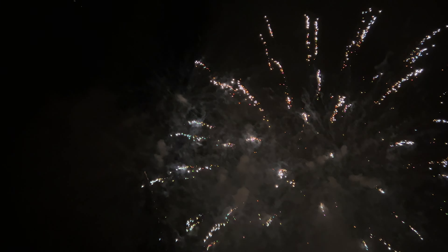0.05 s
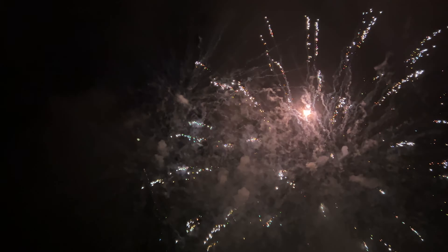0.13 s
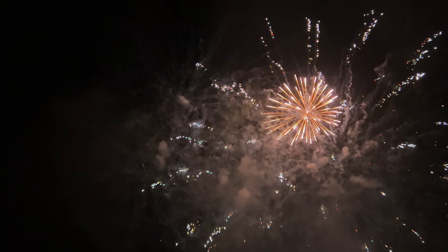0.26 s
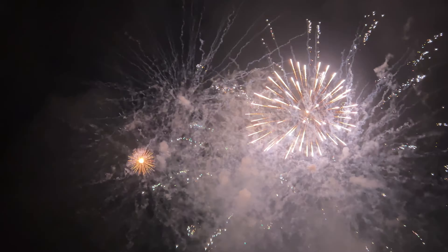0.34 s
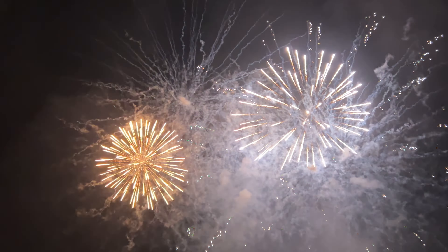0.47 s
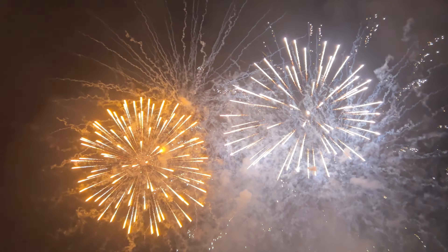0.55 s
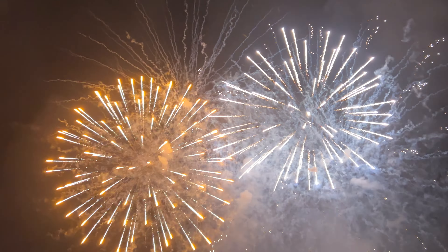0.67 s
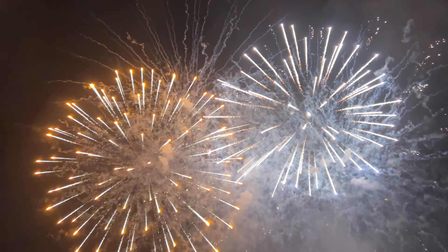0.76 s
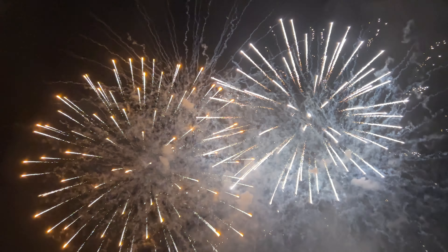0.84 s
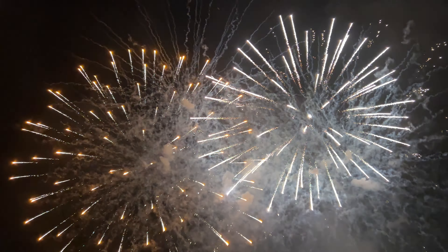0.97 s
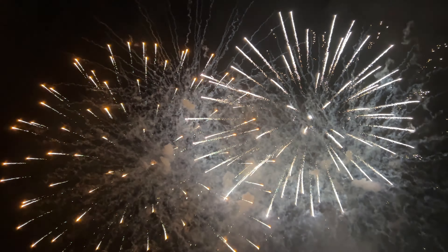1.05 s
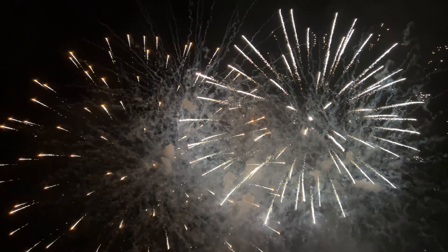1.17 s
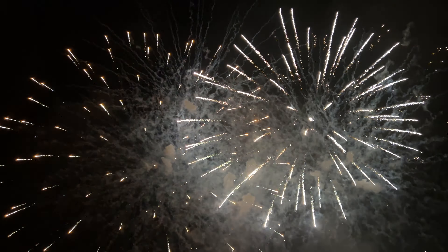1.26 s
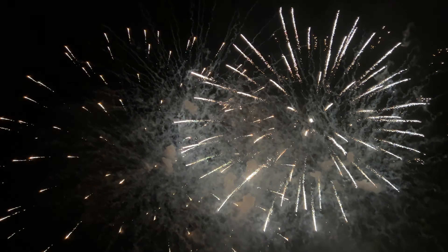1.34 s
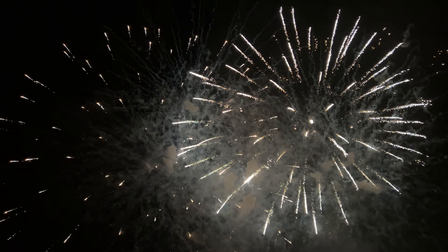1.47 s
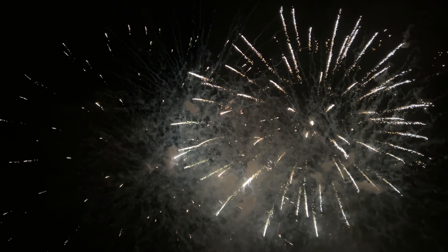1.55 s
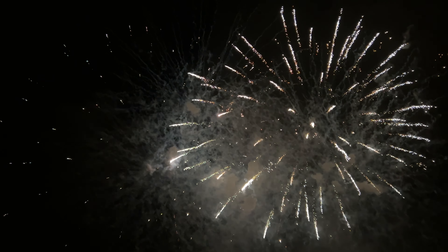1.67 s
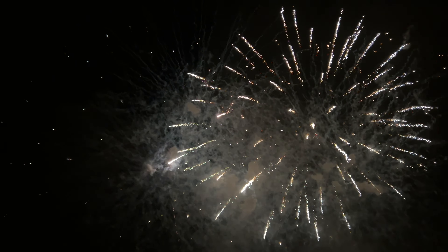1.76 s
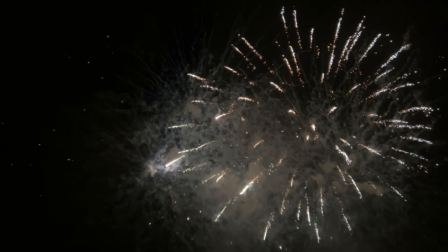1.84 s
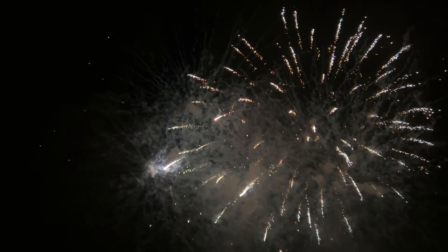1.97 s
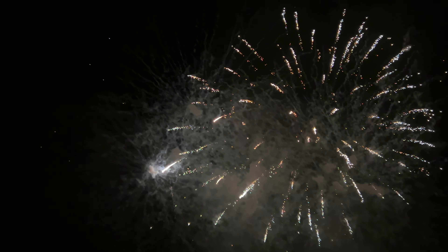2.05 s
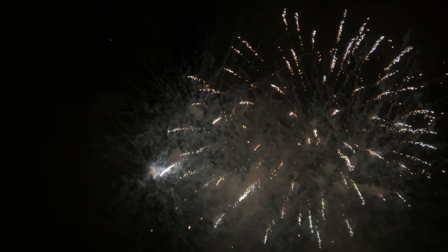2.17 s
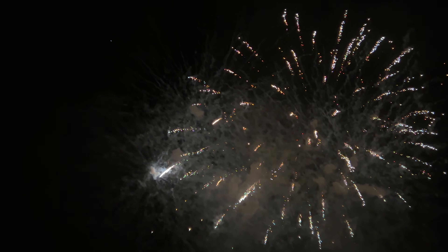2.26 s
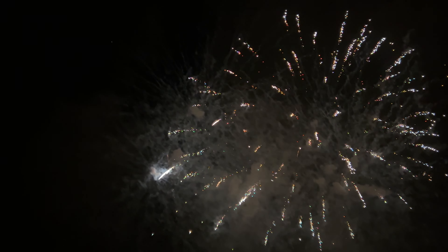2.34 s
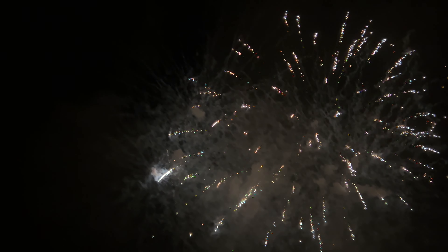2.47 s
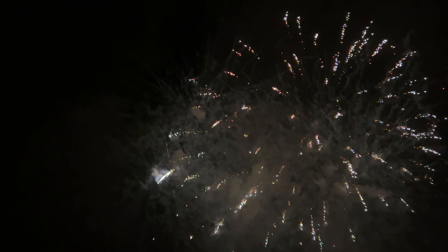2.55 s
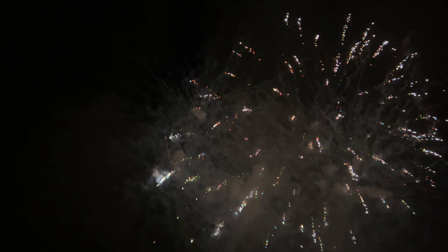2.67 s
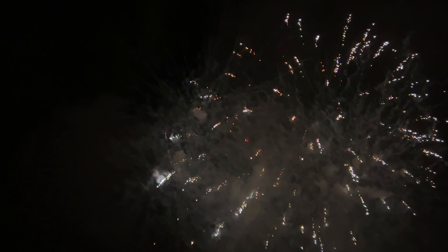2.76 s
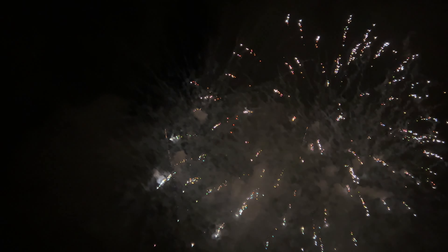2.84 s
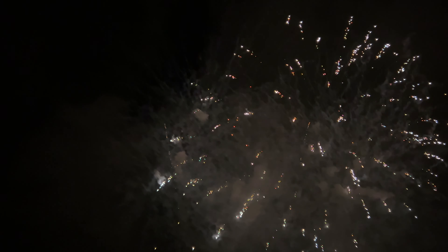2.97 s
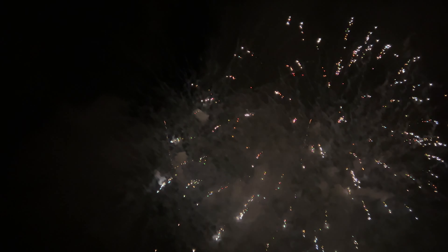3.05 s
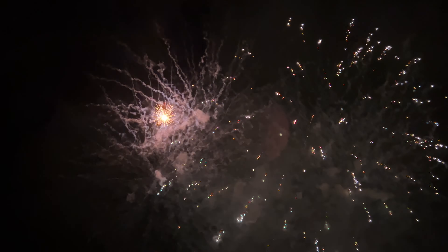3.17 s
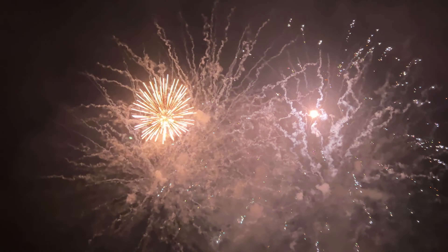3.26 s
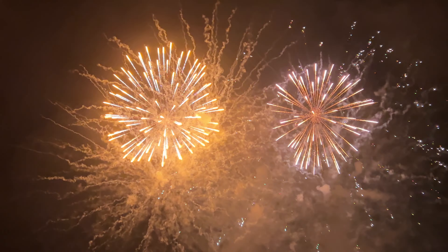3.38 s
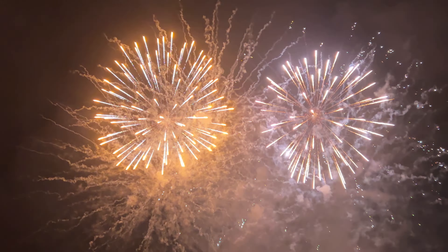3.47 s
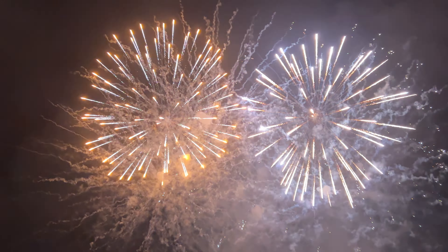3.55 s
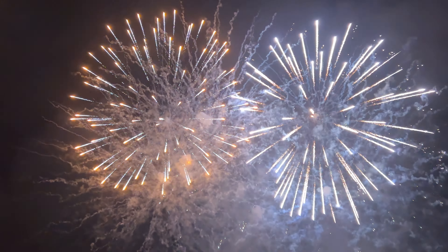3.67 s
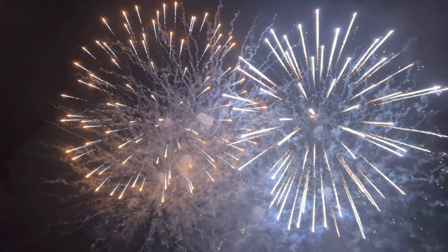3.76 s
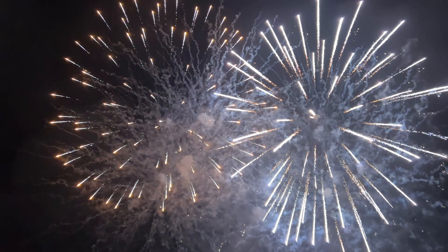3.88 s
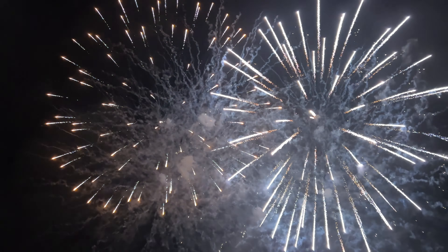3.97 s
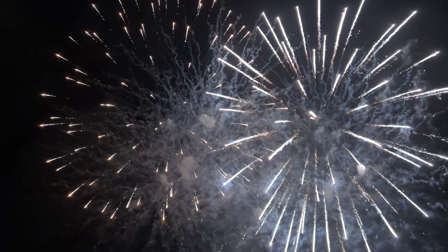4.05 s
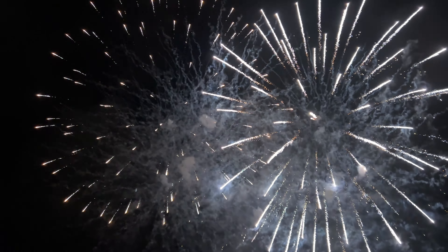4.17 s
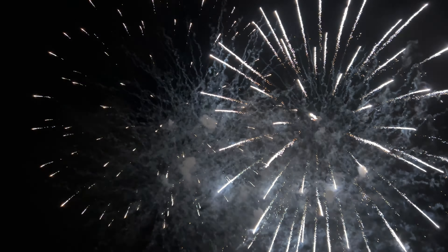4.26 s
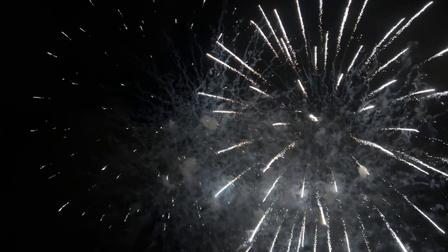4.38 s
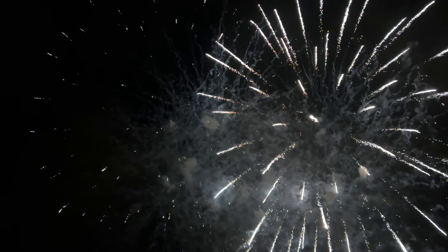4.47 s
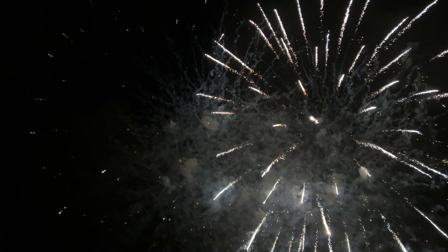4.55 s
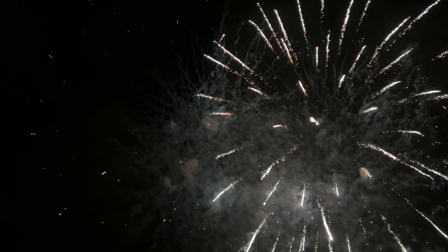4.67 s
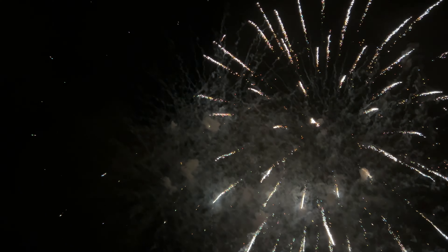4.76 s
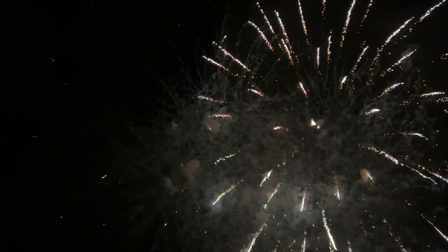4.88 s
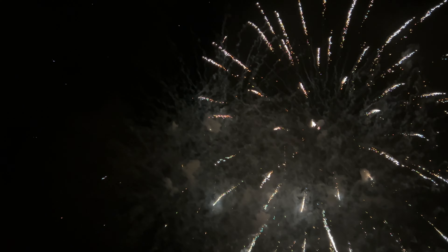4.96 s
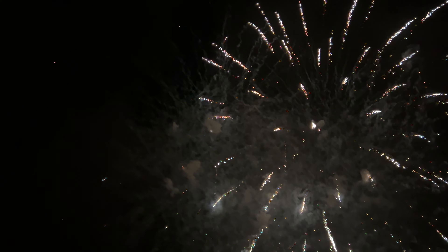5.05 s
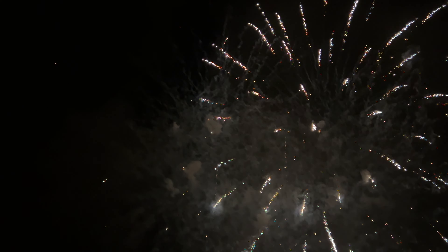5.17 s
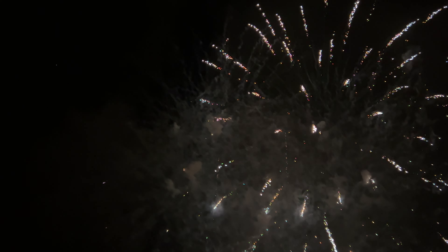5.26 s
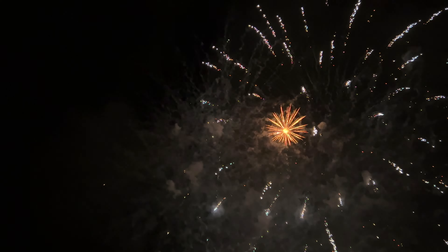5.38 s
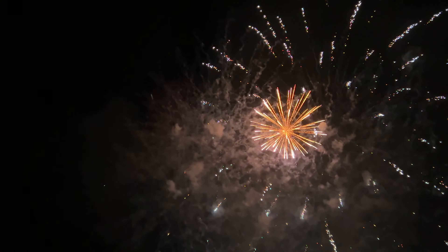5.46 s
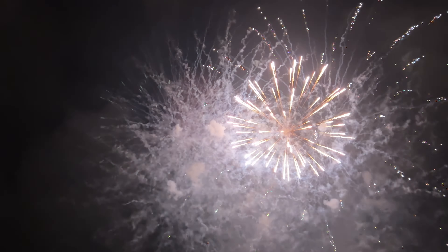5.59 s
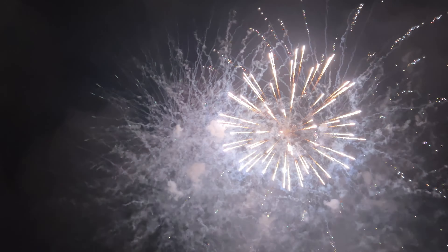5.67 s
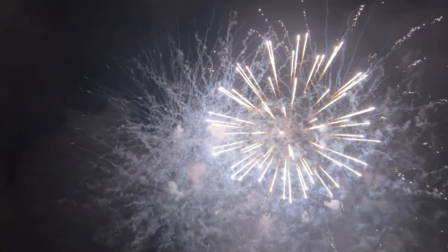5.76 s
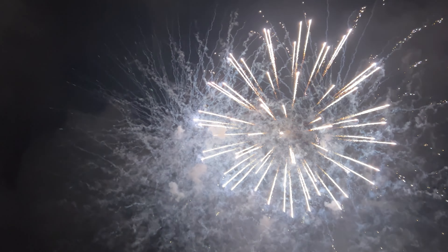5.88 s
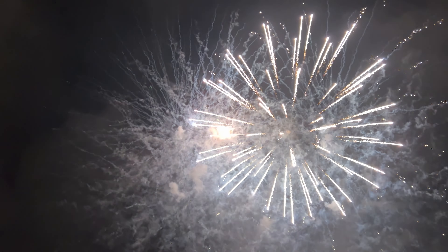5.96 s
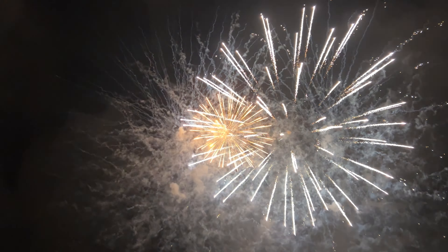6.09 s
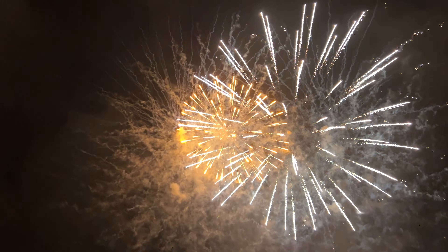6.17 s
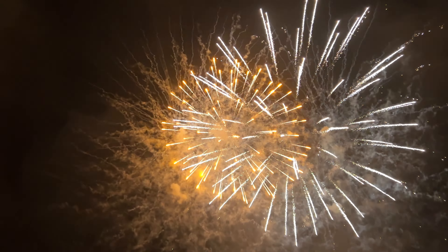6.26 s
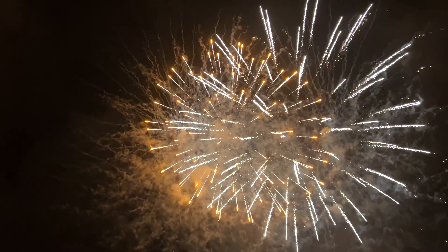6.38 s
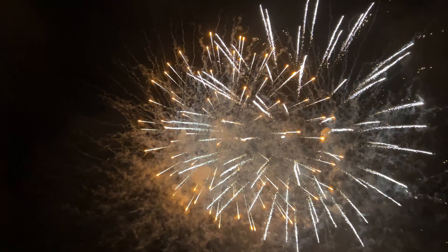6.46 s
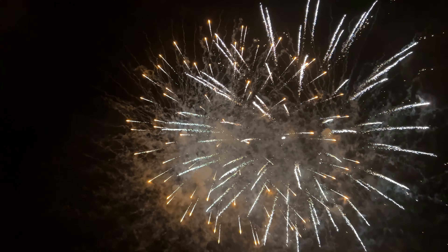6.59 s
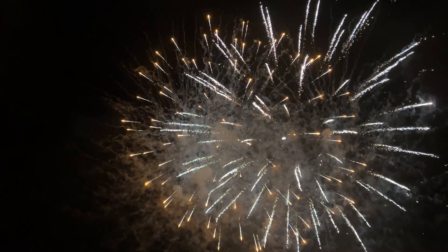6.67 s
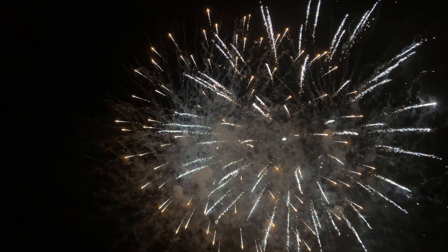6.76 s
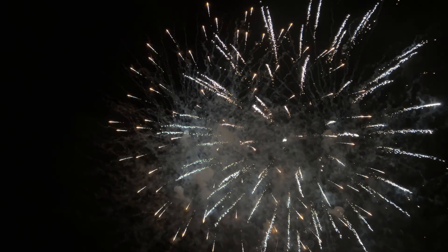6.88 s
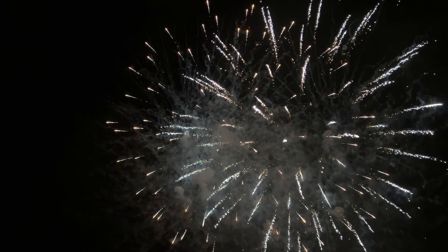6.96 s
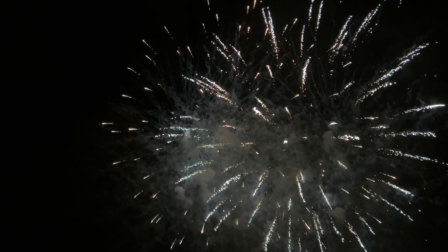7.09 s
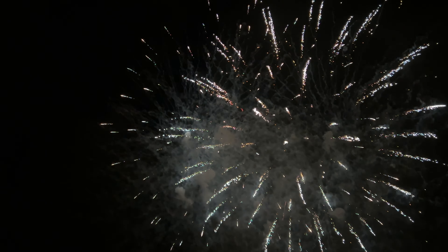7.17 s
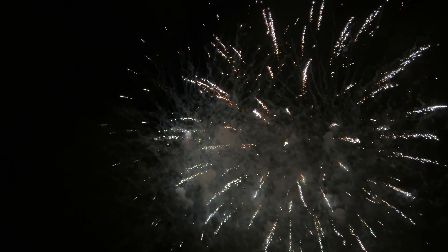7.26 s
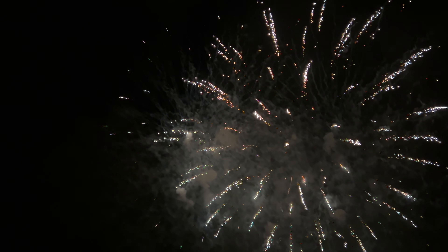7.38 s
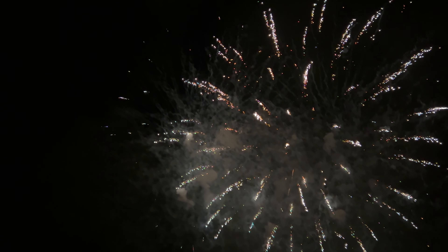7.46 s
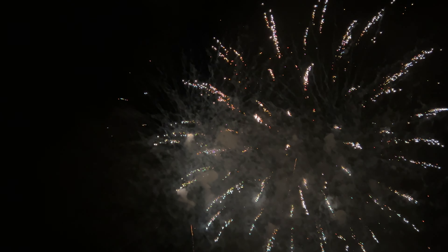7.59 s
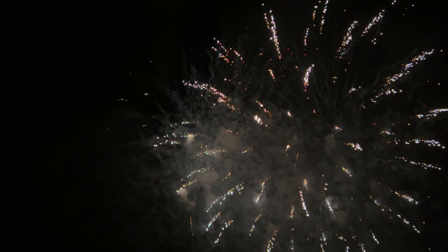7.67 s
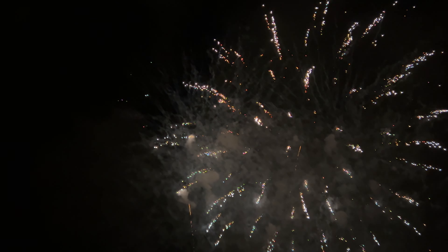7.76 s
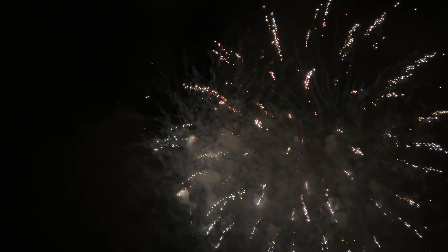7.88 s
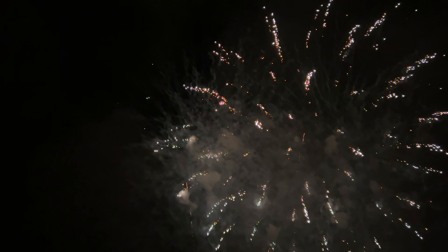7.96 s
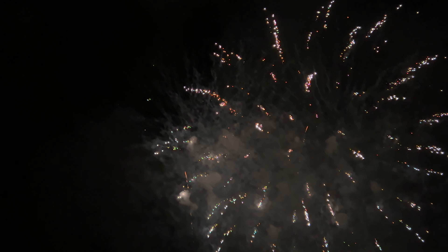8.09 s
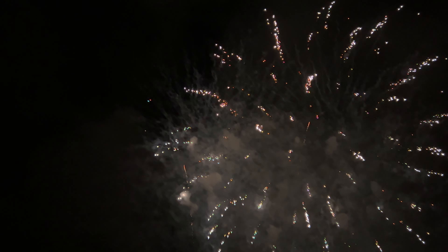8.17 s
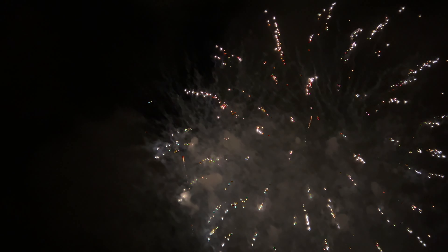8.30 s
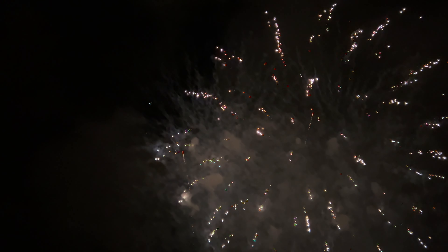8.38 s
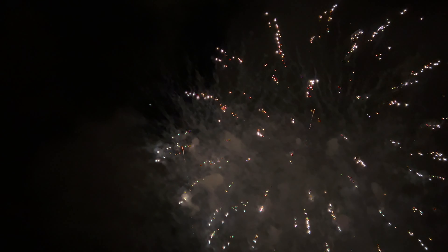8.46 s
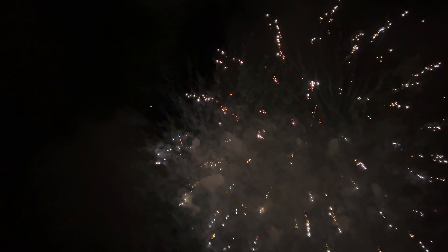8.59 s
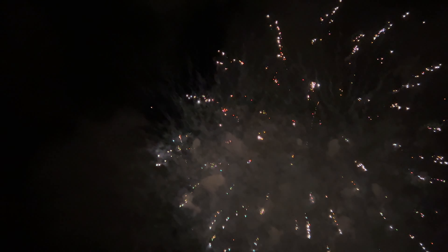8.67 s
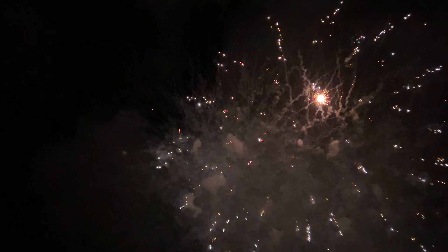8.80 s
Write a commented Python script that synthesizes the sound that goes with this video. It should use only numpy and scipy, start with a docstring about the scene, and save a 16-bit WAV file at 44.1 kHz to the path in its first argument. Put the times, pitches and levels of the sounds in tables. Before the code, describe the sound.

Aerial fireworks outdoors: two close clusters of deep booms and sharp reports, a lone boom, then a bright snapping bang and a lesser pop. Small dry cracks precede some blasts. Each leaves a wide, rough rumble and roar that loses treble as it rolls around distant surfaces. The stereo microphone compresses the loudest hits; faint hiss remains underneath, with no voices or music.

```python
"""First an earlier volley's echo dies away in faint hiss; thin cracks follow, then fireworks bang singly and in clusters.
Each bang is a shaped pulse, a round boom or a sharp report, with ground bounce, near scatter and building slap.
Cracks are short bright noise; the echo around the place is bands of noise that decay faster in the treble.
The microphone pair smears each blast into a short falling thump, and the limiter ducks after the loudest."""
import sys
import numpy as np
from scipy import signal
from scipy.fft import rfft, irfft, next_fast_len
from scipy.io import wavfile
from scipy.ndimage import uniform_filter1d, minimum_filter1d, map_coordinates

SR = 44100
rng = np.random.default_rng(int(sys.argv[2]) if len(sys.argv) > 2 else 0)


def digitize_waveform(pressure):
    """Quantize a signal to 16-bit integers and store it at the path in sys.argv[1].

    Rows of a 2-D input are taken as channels; values are limited to [-1, 1].
    """
    field = np.atleast_2d(pressure).T
    bounded = np.clip(field, -1, 1)
    quanta = np.round(bounded * 32767).astype(np.int16)
    wavfile.write(sys.argv[1], SR, quanta)


N = 389403  # length in samples

# faint steady hiss around the microphones: pitch_hz, density_db (per Hz, relative)
AIR_SPECTRUM = [(1500, 2.5), (3000, -3.5), (7500, -1.5), (10000, -0.5), (12500, -7.5), (15000, -22)]
# left-right likeness of sound from all around: pitch_hz, correlation (limited to +-0.98 in use)
LIKENESS = [(30, .93), (80, 0.98), (200, 0.85), (400, 0.18), (750, -0.33), (1550, -0.42), (1750, 0.79),
            (3300, 0.48), (5800, 0.23), (7100, 1), (9200, -0.86), (10200, -2.3), (11000, -0.026),
            (12000, 0.57), (15000, 0.82)]

# an earlier volley, before the start: start_s, echo_db
EARLIER_VOLLEY = (-1.64, 10)
# rolling echo of each band: near_db, near_t60_s, far_db, far_t60_s, distant_slopes_db
RUMBLE_DECAY = (-18.5, 1.63, -34, 10.5, -58.5)
ROAR_DECAY = (-30.5, 2, -42, 9.5, -53)
HISS_DECAY = (-36.5, 2.13, -48, 6, -74.5)
FIZZ_DECAY = (-39, 1.5, -67, 5, -103)
# spectra of the echo bands, low to high: pitch_hz, density_db (per Hz, relative)
RUMBLE_SPECTRUM = [(20, -51), (40, -11), (65, 0.5), (110, 2), (170, 0), (240, -9), (330, -15), (600, -78)]
ROAR_SPECTRUM = [(180, -20), (330, -2.5), (450, 7), (540, 2), (650, -4.5), (1000, -8.5), (1550, -13.5),
                 (2200, -72)]
HISS_SPECTRUM = [(1000, -3.5), (1550, 5), (2000, -2), (3000, -5.5), (4500, -12.5), (6000, -23),
                 (9000, -30.5), (12500, -49), (16000, -74)]
FIZZ_SPECTRUM = [(2000, -11.5), (4500, -2), (6000, -9), (9000, -11.5), (13000, -20.5), (15500, -37.5)]
# claps from far walls, and finer crackle from small surfaces: pitch_hz, density_db (per Hz, relative)
CLAP_SPECTRUM = [(200, -17), (500, -0.5), (1100, -1), (1800, -13), (3000, -22), (6000, -32.5),
                 (12000, -67.5)]
CRACKLE_SPECTRUM = [(250, -26.5), (600, 13), (1400, 0.5), (2500, -5.5), (5000, -16.5), (8000, -34.5),
                    (14000, -68.5)]
# surges from large far surfaces: centre_s, level_db, half_width_s (Gaussian sigma)
SURGES = [(1.09, -26, 0.082), (2.17, -39.5, 0.099), (4.011, -15.5, .03), (6.11, -36, 0.077),
          (6.601, -21, 0.031)]
# spectrum of the surges: pitch_hz, density_db (per Hz, relative)
SURGE_SPECTRUM = [(60, -15.5), (120, 16), (200, 5.5), (330, -15), (500, -3.5), (1300, -10), (2000, -18.5),
                  (4000, -27), (8000, -51), (14000, -69)]
# short band-limited swells in the echo: centre_s, level_db, pitch_hz, half_band_octaves, half_width_s (sigma)
ECHO_SWELLS = [(0.122, -32, 84, .6, 0.028), (1.263, -33, 119, 0.77, .012), (1.949, -41.5, 377, 0.47, 0.026),
               (2.259, -42, 150, .5, 0.039), (2.45, -31.5, 81, 0.69, 0.024), (3.48, -12, 100, 0.18, 0.01),
               (3.971, -20, 83, 0.26, 0.048), (4.621, -32, 164, 0.66, 0.07),
               (4.82, -27.5, 150, 0.47, 0.017), (5.15, -40.5, 370, 0.54, .03),
               (5.321, -34, 85, 0.67, 0.042), (6.036, -17, 160, 0.28, 0.017),
               (6.191, -21, 170, 0.43, 0.021), (6.517, -14.5, 1420, 0.18, 0.0074),
               (6.585, -33, 1400, 1, .025), (6.517, -13, 95, .5, 0.0075), (6.621, -18, 165, 0.39, 0.02),
               (6.731, -24.5, 74, 0.74, 0.067), (7.127, -20, 96, 0.71, .025), (8.149, -35.5, 80, .6, 0.019)]

# thin cracks of small charges: start_s, level_db (before a common trim), t60_s
CRACKS = [(.58, -40, 0.31), (.642, -31.5, 0.014), (.661, -32, 0.026), (0.6823, -17.5, 0.024),
          (0.781, -16, 0.019), (.868, -10.5, .015), (.932, -6, 0.029), (1.82, -41.5, .03),
          (3.238, -38.5, 0.14), (3.301, -35, 0.3), (3.332, -19.5, 0.012), (3.375, -16, 0.025),
          (3.389, -14.5, 0.042), (3.395, -18.5, 0.52), (3.441, -21, 0.0083), (5.07, -45, .025),
          (6.306, -19.5, .022), (6.404, -23, .034), (7.003, -40.5, 0.023), (7.386, -35, .07),
          (7.901, -42, 0.08), (8.807, -38, 0.22)]
# spectrum of the cracks: pitch_hz, density_db (per Hz, relative)
CRACK_SPECTRUM = [(200, -17.5), (900, 6), (2000, 6.5), (3300, -4), (4600, 3.5), (6000, -7.5),
                  (12000, -12.5), (14000, -28), (16000, -68.5)]

# bangs, each a main blast, a lesser pop or a hard echo: start_s, peak_db (nominal, ahead of the limiter),
# echo_db, sharpness (0 boom to 1 report), thump_db, bark_db, snap_db, near_scatter_db, building_slap_db
BANGS = [(.6965, 5.5, -35, 0.18, -4.5, 2.5, -16, -18, -33), (.7022, 15, 0, 0.49, 18.5, -8, 1, -14, -18),
         (0.8047, 11.5, 6.5, 0.43, 1, -3.5, -7, -31, -31), (.888, -6.5, -27, 0.95, 12, 1, 9, 4.5, -1.5),
         (.999, -14, -22, 0.7, 5, -4, 6, 2, -33), (1.032, -15, -23.5, 1, -8, -12, 5, -2, -20),
         (1.197, -22, -35, 0.95, 6, 5, -11, -1.5, -17), (1.241, -17.5, -33.5, 0.7, 2, -8.5, -8, -1, -6),
         (1.926, -24.5, -29.5, 0.4, 14.5, -5.5, 1, 8, -20), (3.4607, 4, 1, 0.77, 3.5, 0.5, 9, 0.5, -2.5),
         (3.525, -7, -24, 1, 5.5, -6, -10.5, 7, -29), (3.635, 19, -0.5, 0.48, 5.5, -5.5, -6.5, -28, -26),
         (3.711, 1, -28, 0.87, 11.5, 5.5, 11.5, -7.5, -2), (3.7495, 17, 7, 0.45, 22.5, 4.5, 8.5, 1, -17),
         (5.8806, 15, 2.5, 0.48, 5, -1, -3.5, -28, -36), (6.1, -16, -30, 0.87, 15, -3, 0, -3, -10),
         (6.134, -20, -30, 0.95, 7, -2.5, -1, 4.5, -16), (6.4862, 8.5, 3, 0.34, 11.5, 7, 21.5, -18.5, -18),
         (6.502, -3.5, -20, 1, 4.5, 1.5, -8, -8, -4.5), (6.81, -21.5, -43, 0.8, -2.5, -7, -19.5, 1, -7),
         (7.0305, 4.5, -9.5, 0.96, 2.5, 2.5, 9.5, -10.5, -9.5), (7.339, -20, -28, 1, 4.5, 1, -16, 1, -3),
         (8.041, -33, -51, 0.4, -6.5, 32, -40, -4, -4.5)]
# spectra of a round boom and of a sharp report: pitch_hz, density_db (per Hz, relative)
BOOM_SPECTRUM = [(25, -31), (60, -32), (110, -11.5), (165, 1.5), (220, -3.5), (275, 7), (340, -7),
                 (445, -1.5), (540, -10.5), (1000, -25.5), (2000, -31.5), (3000, -38), (3800, -56),
                 (5000, -43), (7400, -53), (8600, -52.5), (10000, -71.5), (12000, -56.5), (16000, -82.5)]
REPORT_SPECTRUM = [(25, -20.5), (70, 5), (110, 6.5), (170, -4.5), (300, -25.5), (580, -12.5), (800, -10),
                   (1150, -12.5), (1700, -21), (2250, -19.5), (2900, -26), (4500, -21.5), (6000, -37.5),
                   (8000, -27.5), (10000, -43), (12000, -31.5), (16000, -53.5)]
# colour of the nearby scatter and of the slap from buildings: pitch_hz, level_db
NEAR_COLOUR = [(60, -2.5), (300, -10.5), (650, 4.5), (1450, 13), (2100, 2.5), (5000, 2.5), (15000, -5)]
SLAP_COLOUR = [(60, -3.5), (300, -6.5), (650, 7.5), (1300, 9.5), (5000, 4), (15000, -2.5)]
# low frequencies pass the microphone late: pitch_hz, delay_ms
MIC_DELAY = [(50, 14.64), (100, 17.26), (160, 13.47), (250, 10.03), (400, 1.9), (700, 1.5), (1500, 0.45),
             (4000, 0.48)]
# a round boom drives the two ports out of step: pitch_hz, left_lead_rad (shrinks to none as sharpness reaches 1)
PORT_PHASE = [(50, 0.92), (130, 0.9), (350, 0.45), (800, -0.4), (1500, 0.12), (2500, -0.12), (4500, .8),
              (7000, 0.39)]
# the left port hears the direct blast brighter in places: pitch_hz, left_minus_right_db
PORT_BALANCE = [(500, 0), (1000, 7), (2000, 5.5), (4000, 3.5), (8000, -0.5)]
# colour of the tearing casing: pitch_hz, level_db
TEAR_COLOUR = [(100, -28.5), (450, 4.0), (900, 10.5), (1400, 13), (2100, 11.5), (3000, 6.0), (6000, 5.5),
               (14000, -9.0)]
# colour of the recorder's filter ringing ahead of a boom: pitch_hz, level_db
PRE_RING_COLOUR = [(190, -51), (350, -3.5), (700, 0.5), (1800, -1), (2800, -22), (6000, -59)]

ECHO_DELAY_S, ECHO_RISE_S = 0.025, 0.065  # distance to the nearest reflectors, then reflections gather
SLOPES_DELAY_S, SLOPES_SPREAD_S = 1.45, 0.23  # distant slopes answer this long after the echo begins
SWELL_RUMBLE_DB, SWELL_ROAR_DB, SWELL_HISS_DB = 1.2, 1.3, 0.6  # depth per unit of wobble
CRACK_TRIM_DB = -7.5
CRACK_CLICK_DB, CRACK_CLICK_T60_S = -1.5, 0.0019
TEAR_DB, TEAR_T60_S = -7, 0.014  # level for a fully sharp report
RUN_UP_S = 0.08  # room ahead of each blast
PORT_LAG_MS = 0.02  # right port behind left
TOP_HZ = 16100  # recorder's band limit


def amp(db):
    """Decibels to gain."""
    return 10 ** (np.asarray(db) / 20)


def unit(x):
    """Scale to rms 1."""
    return x / np.sqrt(np.mean(x ** 2) + 1e-20)


def along(points, hz):
    """Read (pitch_hz, value) points on a log frequency axis."""
    f, v = np.transpose(points)
    return np.interp(np.log(hz + 1), np.log(f), v)


def wobble(rate):
    """A smooth random curve, rate knots a second."""
    knots = rng.standard_normal(int(N * rate / SR) + 4)
    return map_coordinates(knots, [np.arange(N) * rate / SR])


def filtered(x, response):
    """Apply a response given as a function of frequency."""
    n = x.shape[-1]
    m = next_fast_len(n + SR // 10)
    spectrum = rfft(x, m) * response(np.fft.rfftfreq(m, 1 / SR))
    return irfft(spectrum, m)[..., :n]


def spread(pair, spectrum):
    """Two unrelated signals become coloured stereo from all around, its mid part at rms 1."""
    def mid_side(hz):
        turn = np.arccos(np.clip(along(LIKENESS, hz), -.98, .98)) / 2
        return amp(along(spectrum, hz)) * np.array([np.cos(turn), np.sin(turn)])

    mid, side = filtered(pair, mid_side)
    return np.array([mid + side, mid - side]) / np.std(mid)


def add(out, sound, s):
    """Mix a stereo sound in at time s, trimming what falls outside."""
    start = round(s * SR)
    sound, start = sound[:, max(-start, 0):], max(start, 0)
    part = out[:, start:start + sound.shape[1]]
    part += sound[:, :part.shape[1]]


def ragged(size, grain_s, depth_db):
    """Two noises whose strength varies unevenly from grain to grain, together at rms 1."""
    place = np.arange(size) / (grain_s * SR)
    knots = rng.standard_normal(size // 10 + 4)
    strength = np.clip(map_coordinates(knots, [place], order=1), -2, 2)
    return unit(amp(depth_db * strength) * rng.standard_normal((2, size)))


def steady_hiss(floor_db):
    """Stationary coloured noise, faint and even all around the microphones."""
    return amp(floor_db) * spread(rng.standard_normal((2, N)), AIR_SPECTRUM)


def roll_db(near_db, near_t60, far_db, far_t60, slopes_db):
    """Level of one echo band: after every bang it gathers, falls fast, lingers, and the slopes answer."""
    t = np.arange(0, N + 200, 200) / SR
    volleys = [EARLIER_VOLLEY] + [(row[0], row[2]) for row in BANGS]
    s, db = np.transpose(volleys)
    age = np.maximum(t - s[:, None] - ECHO_DELAY_S, 0)
    gather = amp(db)[:, None] * (1 - np.exp(-age / ECHO_RISE_S))
    near = amp(near_db - 60 * age / near_t60)
    far = amp(far_db - 60 * age / far_t60)
    slopes = amp(slopes_db) * np.exp(-.5 * ((age - SLOPES_DELAY_S) / SLOPES_SPREAD_S) ** 2)
    power = (gather ** 2 * (near ** 2 + far ** 2 + slopes ** 2)).sum(0)
    return np.interp(np.arange(N) / SR, t, 10 * np.log10(power + 1e-20))


def reflections(spectrum, rate, size_db, wash):
    """Countless small echoes of uneven size, rate a second, on a diffuse wash."""
    arrive = rng.random(N) < rate / SR
    sizes = amp(size_db * rng.standard_normal(N)) * rng.standard_normal((2, N))
    return spread(unit(arrive * sizes) + wash * rng.standard_normal((2, N)), spectrum)


def patchy(x, depth_db):
    """Overlapping echoes reinforce and cancel in passing patches of time and pitch; rms 1."""
    z = signal.stft(x, nperseg=1024)[2]
    field = uniform_filter1d(rng.standard_normal(z.shape[1:]), size=4, axis=0)  # across pitch
    field = uniform_filter1d(field, size=8, axis=1)  # across time
    return unit(signal.istft(z * amp(depth_db * unit(field)), nperseg=1024)[1][:, :N])


def slaps(spectrum, rate, size_db, t60):
    """Single far surfaces each return a short decaying clap, at random moments."""
    arrive = (rng.random(N) < rate / SR) * amp(size_db * rng.uniform(-0.96, 1, N))
    decay = amp(-60 * np.arange(SR // 10) / SR / t60)
    envelope = signal.fftconvolve(arrive, decay)[:N]
    return spread(envelope * rng.standard_normal((2, N)), spectrum)


def surges():
    """Large far surfaces throw a volley back in one rough swell."""
    t = np.arange(N) / SR
    level = sum(amp(db) * np.exp(-.5 * ((t - s) / width) ** 2) for s, db, width in SURGES)
    return level * spread(ragged(N, grain_s=.004, depth_db=6.0), SURGE_SPECTRUM)


def echo_swells():
    """Short band-limited swells of noise in the echo, each at its own pitch."""
    out = np.zeros((2, N))
    t = np.arange(-SR // 4, SR // 4) / SR
    for s, db, hz, octaves, width in ECHO_SWELLS:
        shape = np.exp(-.5 * (t / width) ** 2)
        skirt = 2 ** octaves
        band = [(hz / skirt ** 2, -45), (hz / skirt, -6), (hz, 0),
                (hz * skirt, -6), (hz * skirt ** 2, -35), (hz * skirt ** 4, -100)]
        noise = shape * spread(rng.standard_normal((2, len(t))), band)
        add(out, amp(db) * unit(noise) * np.sqrt(np.mean(shape ** 2)), s + t[0])
    return out


def echo():
    """Blasts roll back from ground and buildings; air strips the treble from the late, far echoes."""
    swell, hiss_db = wobble(13), roll_db(*HISS_DECAY)
    rumble = reflections(RUMBLE_SPECTRUM, rate=290, size_db=0.5, wash=1.4)
    rumble = amp(roll_db(*RUMBLE_DECAY) + SWELL_RUMBLE_DB * swell) * rumble
    roar = patchy(reflections(ROAR_SPECTRUM, rate=300, size_db=2.0, wash=1.58), depth_db=2.5)
    roar = amp(roll_db(*ROAR_DECAY) + SWELL_ROAR_DB * swell) * roar
    hiss = patchy(reflections(HISS_SPECTRUM, rate=520, size_db=4.5, wash=2.7), depth_db=1.5)
    hiss = amp(hiss_db + SWELL_HISS_DB * swell) * hiss
    claps = amp(hiss_db - 7) * slaps(CLAP_SPECTRUM, rate=48, size_db=7.5, t60=0.057)
    crackle = amp(hiss_db - 5.5) * slaps(CRACKLE_SPECTRUM, rate=210, size_db=5, t60=0.014)
    fizz = amp(roll_db(*FIZZ_DECAY)) * spread(rng.standard_normal((2, N)), FIZZ_SPECTRUM)
    return rumble + roar + hiss + claps + crackle + surges() + echo_swells() + fizz


def cracks():
    """Small charges give a click and a brief bright spray; the long ones swell in as a soft fizz."""
    out, t = np.zeros((2, N)), np.arange(SR // 4) / SR
    for s, db, t60 in CRACKS:
        spray = spread(ragged(len(t), grain_s=0.0008, depth_db=0), CRACK_SPECTRUM)
        rise = 1 - np.exp(-t / (0.28 * t60 ** 2))
        # the casing splits with a click ahead of the spray
        fall = amp(-60 * t / t60) + amp(CRACK_CLICK_DB - 60 * t / CRACK_CLICK_T60_S)
        add(out, amp(db + CRACK_TRIM_DB) * spray * rise * fall, s)
    return out


def blast_colour(hz, sharp, thump_db, bark_db, snap_db):
    """Between boom and report, with a low thump shelf, a bark around 880 Hz and a high snap shelf."""
    colour = (1 - sharp) * along(BOOM_SPECTRUM, hz) + sharp * along(REPORT_SPECTRUM, hz)
    bark = bark_db * np.exp(-np.log2((hz + 1) / 880) ** 2)
    thump = thump_db / (1 + (hz / 420) ** 4)
    snap = snap_db * hz ** 2 / (hz ** 2 + 5000 ** 2)
    return amp(colour + bark + thump + snap)


def casing_tear(hz, t, sharp):
    """Spectrum of the casing tearing raggedly: a brief noise, strongest in a sharp report."""
    decay = amp(-60 * t / TEAR_T60_S)
    decay = amp(TEAR_DB - 6 * (1 - sharp)) * decay / np.linalg.norm(decay)
    return rfft(rng.standard_normal(len(t)) * decay) * amp(along(TEAR_COLOUR, hz))


def nearby_spray(t, scatter_db, slap_db):
    """Spectrum of scatter from things close by at once, and of the later slap from a row of buildings."""
    near = ragged(len(t), grain_s=.0016, depth_db=3.0) * amp(-60 * t / 0.13)  # t60 0.13 s
    near = spread(near, NEAR_COLOUR)
    late = np.maximum(t - 0.044, 0) / 0.025  # starts at 44 ms, peaks 25 ms later
    slap = spread(ragged(len(t), grain_s=0.0027, depth_db=3) * late * np.exp(-late), SLAP_COLOUR)
    near = amp(scatter_db) * near / np.linalg.norm(near[0])
    slap = amp(slap_db) * slap / np.linalg.norm(slap[0])
    return rfft(near + slap)


def blast(sharp, thump_db, bark_db, snap_db, scatter_db, slap_db):
    """One pressure pulse of nominal peak 1 with its nearby reflections, after a short run-up."""
    size = 16384
    hz, t = np.fft.rfftfreq(size, 1 / SR), np.arange(size) / SR

    def lag(ms):
        return np.exp(-2j * np.pi * hz * ms / 1000)

    colour = blast_colour(hz, sharp, thump_db, bark_db, snap_db)
    # a round boom bounces dully off the ground, then reaches one port just before the other
    ground = (1 - sharp) * amp(-17) * lag(6.37) / (1 + (hz / 1500) ** 2)
    direct = np.array([lag(-PORT_LAG_MS / 2), lag(PORT_LAG_MS / 2)]) * (1 + ground)
    direct = direct * amp(np.outer([.5, -.5], along(PORT_BALANCE, hz)))
    ports = np.exp(1j * (1 - sharp) * np.outer([.5, -.5], along(PORT_PHASE, hz)))
    tear = casing_tear(hz, t, sharp)
    spray = nearby_spray(t, scatter_db, slap_db)
    # the microphone draws the bass out: phase is the running sum of delay over frequency
    phase = 2 * np.pi * np.cumsum(along(MIC_DELAY, hz)) * hz[1] / 1000
    smear = np.exp(-1j * phase)
    # the recorder's filters ring dully just ahead of a boom, with the smear's phase partly reversed
    pre_ring = amp(-19) * (1 - sharp) * np.exp(1j * 0.84 * phase) * lag(-2.1)
    pre_ring = pre_ring * amp(along(PRE_RING_COLOUR, hz))
    pulse = irfft(colour * ports * (smear * (direct + tear + spray) + pre_ring))
    peak = np.abs(irfft(colour * smear)).max()
    return np.roll(pulse, round(RUN_UP_S * SR), axis=1) / peak


def bangs():
    """Each row is one bang, a main blast, a lesser pop or a hard echo, from round boom to sharp report."""
    out = np.zeros((2, N))
    for s, db, _, *character in BANGS:
        add(out, amp(db) * blast(*character), s - RUN_UP_S)
    return out


def scene(floor_db=-77):
    """Bangs and cracks over their echo and a faint steady hiss."""
    return steady_hiss(floor_db) + echo() + cracks() + bangs()


def limiter(x, ceiling, ahead_s, hold_s, release_s):
    """The gain drops just before a peak, holds, then recovers quickly at first and ever more slowly."""
    cut = 1 - 1 / np.maximum(np.abs(x).max(0) / ceiling, 1)
    ahead, hold = int(ahead_s * SR), int(hold_s * SR)
    held = -minimum_filter1d(-cut, hold, origin=(hold - 1) // 2)
    # exponential release: a running maximum of the log cut against a falling line
    elapsed = np.arange(N) / SR / release_s
    cut = np.exp(np.maximum.accumulate(np.log(held + 1e-20) + elapsed) - elapsed)
    gain_db = 20 * np.log10(1 - cut)
    return x * amp(uniform_filter1d(minimum_filter1d(gain_db, ahead), ahead))


def record(dry):
    """The recorder ducks after the blasts, rounds off overshoots and keeps nothing above its band limit."""
    limited = limiter(dry, ceiling=0.99, ahead_s=0.0043, hold_s=0.049, release_s=0.23)
    rounded = limited / (1 + np.abs(limited / .95) ** 6) ** (1 / 6)
    return filtered(rounded, lambda hz: hz < TOP_HZ)


dry = scene()
out = record(dry)
digitize_waveform(out)
```